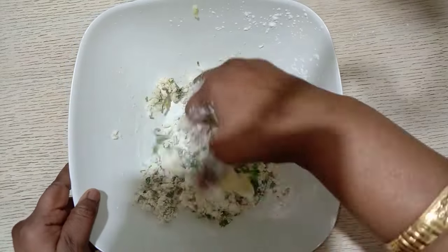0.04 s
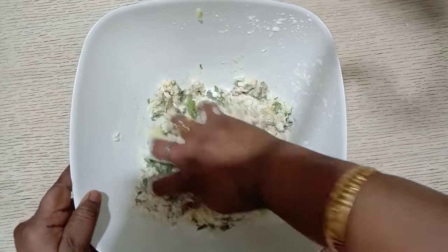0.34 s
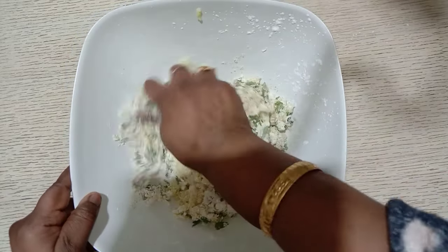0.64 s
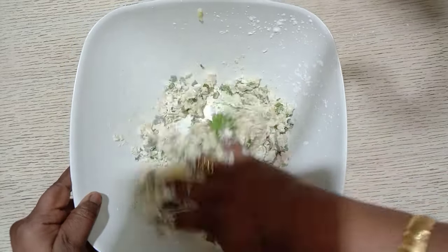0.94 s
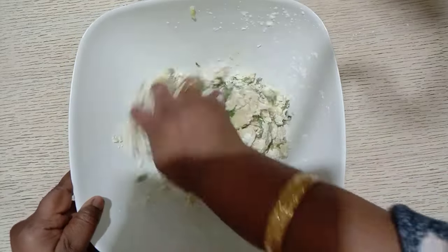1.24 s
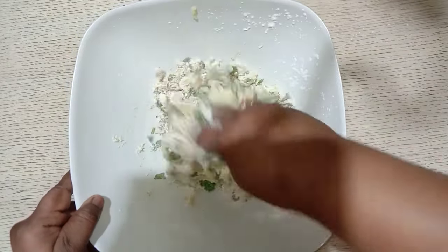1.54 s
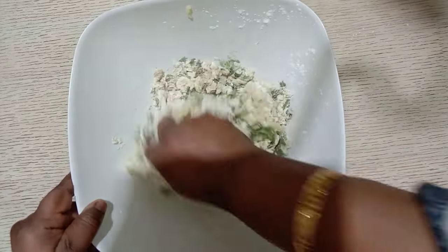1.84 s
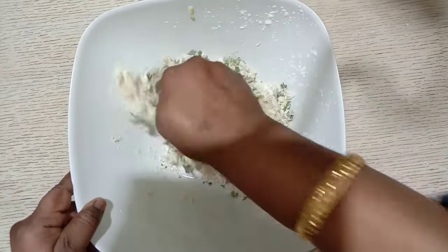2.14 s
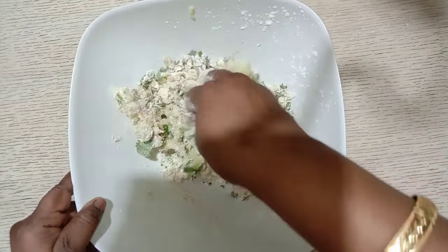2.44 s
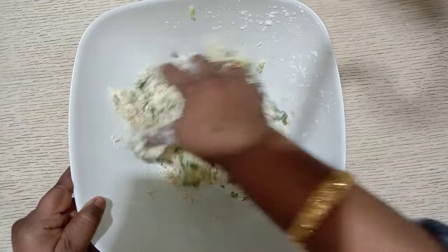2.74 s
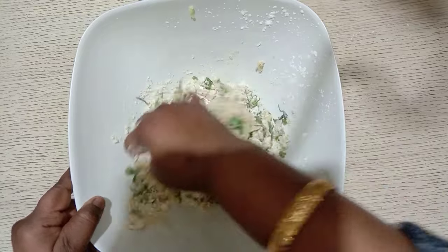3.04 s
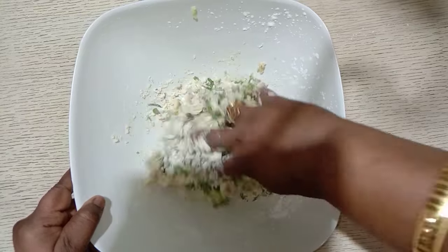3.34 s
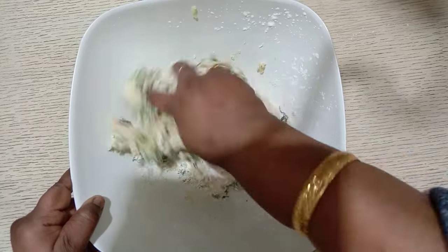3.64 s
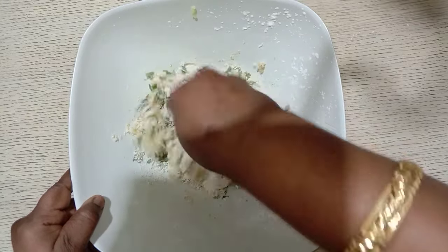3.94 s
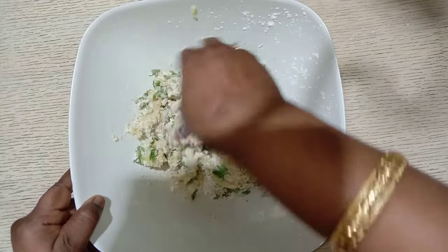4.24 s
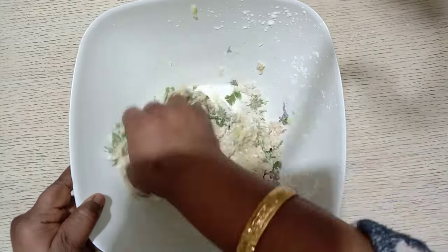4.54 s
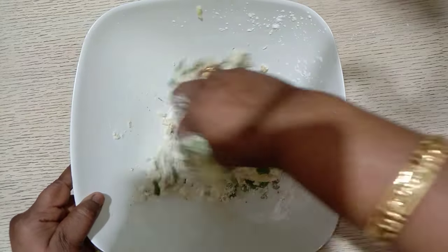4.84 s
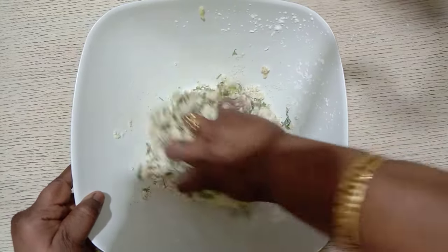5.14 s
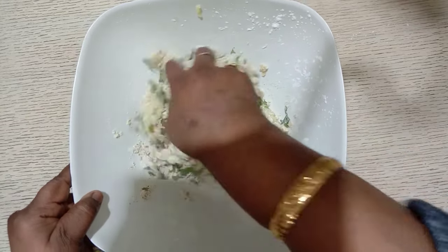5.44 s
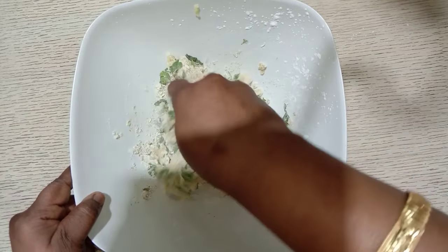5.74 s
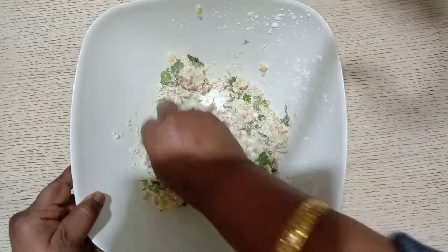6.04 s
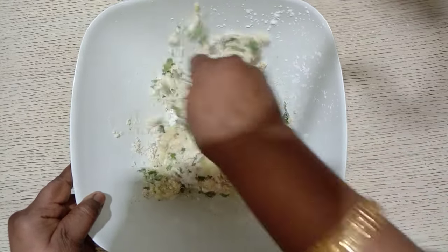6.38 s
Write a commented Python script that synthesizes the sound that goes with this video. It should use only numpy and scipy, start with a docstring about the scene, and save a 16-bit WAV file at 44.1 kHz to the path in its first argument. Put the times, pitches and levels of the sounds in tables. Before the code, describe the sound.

Quiet, irregular swishes and squelches of hand mixing, broken by three much louder clonks of a ceramic bowl against a wooden table.

```python
"""A hand kneads floury mashed potato in a ceramic bowl on a wooden table, heard from close by.
Sliding friction makes a soft hiss as each sweep drags crumbs over the glaze. Between sweeps the mash
squelches and moist bits snap; fingers rub and tap, exciting the modes of the bowl.
The palm thuds into the mass; the bowl rocks with low bumps and three times tips and knocks on the table.
A small kitchen adds its reverberation and a faint hum."""
import sys
import numpy as np
from scipy import signal
from scipy.fft import rfft, irfft
from scipy.io import wavfile

SR = 44100
rng = np.random.default_rng(int(sys.argv[2]) if len(sys.argv) > 2 else 0)


def persist_wave(psi):
    """Save psi, clipped to +-1, as 16-bit WAV."""
    counts = np.round(np.clip(psi, -1, 1) * 32767).astype(np.int16)
    wavfile.write(sys.argv[1], SR, np.atleast_2d(counts).T)


N = 287091
T = np.arange(N) / SR
TOP_HZ, FILTER_SIZE = 15550, 16384
FREQS = np.fft.rfftfreq(FILTER_SIZE, 1 / SR)

# Modes of the bowl on the table, damped by the holding hand.
# Each row: frequency in Hz, level in dB, 60 dB decay time in seconds.
BOWL = [(203, -23.5, 0.072), (392, -14.5, 0.044), (522, -16, .03), (664, 4, 0.012), (855, -2.5, 0.008),
        (1236, -18, 0.038), (2130, -23, .012), (4360, -28, .015)]


def undb(db):
    """Amplitude ratio of a level in decibels."""
    return 10 ** (np.asarray(db) / 20)


def unit(x):
    """Normalisation to an rms of 1."""
    return x / np.sqrt(np.mean(x ** 2))


def colour(x, points, peaks=()):
    """Minimum-phase filter through (Hz, dB) points, with resonance peaks (Hz, width in Hz, dB)."""
    hz, db = np.transpose(points)
    db = np.interp(np.log(FREQS + 1), np.log(hz), db)
    for centre, width, height in peaks:
        db = db + height / (1 + (2 * (FREQS - centre) / width) ** 2)
    cepstrum = irfft(np.log(undb(db)))
    cepstrum[1:FILTER_SIZE // 2] *= 2  # folding the cepstrum makes the filter causal
    cepstrum[FILTER_SIZE // 2:] = 0
    response = irfft(np.exp(rfft(cepstrum)))[:SR // 10]
    return signal.oaconvolve(x, response)[:len(x)]


def band(x, hz, kind, order=2):
    """Butterworth filter."""
    return signal.sosfilt(signal.butter(order, np.minimum(hz, TOP_HZ), kind, fs=SR, output="sos"), x)


def walk(rate):
    """Random modulation: Gaussian values, rate per second, joined by straight lines."""
    steps = rng.standard_normal(N // 20)
    return np.interp(T * rate, np.arange(len(steps)), steps)


def add(track, s, sound):
    """Superposition of a sound on a track, starting at s seconds."""
    start = max(int(s * SR), 0)
    track[start:start + len(sound)] += sound[:N - start]


def fade(t, t60):
    """Exponential decay by 60 dB in t60 seconds."""
    return np.exp(-np.log(1000) * t / t60)


def ring(modes):
    """Impulse response of a set of modes: a sum of damped sinusoids."""
    t = T[:SR // 2]
    return sum(undb(db) * np.sin(2 * np.pi * hz * t) * fade(t, t60) for hz, db, t60 in modes)


def grains(rate, spread_db):
    """Shot noise: tiny slips of very unequal size, on average rate per second."""
    sizes = undb(spread_db * np.minimum(rng.exponential(size=N), 5))
    return unit((rng.random(N) < rate / SR) * sizes * rng.standard_normal(N))


def gesture(start, length, attack, release, arch_db, fastest=.5):
    """Friction noise grows with speed: a movement's envelope is arch_db lower at its slow ends."""
    t = T - start
    contact = np.interp(t, [0, attack], [0, 1]) * np.interp(t - length, [0, release], [1, 0])
    slowness = np.interp(t, [0, length * np.clip(fastest, .1, .9), length], [1, 0, 1])
    return contact * undb(-arch_db * slowness ** 2)


def room(x, wet_db, t60_low, t60_high):
    """Reverberation: reflections from near walls merge into a short diffuse tail."""
    t = T[:SR]
    noise = rng.standard_normal(SR)
    tail = band(noise, 1800, "low") * fade(t, t60_low) - band(noise, 1500, "high") * fade(t, t60_high)
    tail *= np.clip((t - .003) / 0.0027, 0, 1)  # the first reflection takes 3 ms
    return undb(wet_db) * signal.fftconvolve(x, tail / np.linalg.norm(tail))[:N]


def kitchen():
    """Ambient noise: quiet air and an appliance's hum, wavering in amplitude and phase."""
    # Spectrum of the air. Each row: frequency in Hz, relative level in dB.
    air_spectrum = [(15, -43), (25, -35), (93, -2), (156, -13.5), (221, -4), (274, -13), (598, -17),
                    (782, -17.5), (919, -20), (1270, -19.5), (2230, -27), (4750, -34.5), (5730, -27),
                    (9050, -37.5), (15500, -32.5)]
    # Tones of the hum. Each row: frequency in Hz, rms level in dB.
    hum_tones = [(76, -77), (98, -76), (208, -81.5)]
    air = unit(colour(rng.standard_normal(N), air_spectrum)) * undb(-70 + 2 * walk(rate=2.4))
    hum = np.zeros(N)
    for hz, db in hum_tones:
        amplitude = np.sqrt(2) * undb(db + 3 * walk(rate=8.5))
        hum += amplitude * np.sin(2 * np.pi * hz * T + 0.42 * walk(rate=16))
    return air + hum


def taps():
    """The brief, hard contact of a fingertip or nail excites the high modes of the bowl."""
    # Taps on the glaze. Each row: start in seconds, peak level in dB.
    contacts = [(0.148, -42), (0.8676, -46.5), (1.3257, -49), (1.654, -57), (3.741, -55), (5.6568, -52),
                (5.743, -47)]
    # High modes. Each row: frequency in Hz, level in dB, 60 dB decay time in seconds.
    glaze_modes = [(1230, -8, .06), (2160, -2.5, 0.049), (2450, 1.5, 0.029), (2900, -12, 0.039),
                   (4704, -3.5, 0.072), (4730, -8, 0.0079)]
    out, tick = np.zeros(N), ring(glaze_modes)
    for s, db in contacts:
        add(out, s, undb(db) * tick / np.abs(tick).max())
    return out


def snaps():
    """Rupture: moist crumbs and bits of herb part with a tiny burst of noise."""
    # Bits parting. Each row: start in seconds, level before filtering in dB.
    ruptures = [(0.1471, -51), (0.768, -50), (0.779, -42.5), (0.8189, -48), (1.4421, -55), (1.5232, -55),
                (1.535, -53), (1.833, -47), (2.013, -56), (2.291, -49.5), (2.575, -48), (3.7749, -40.5)]
    # Spectrum of a snap. Each row: frequency in Hz, gain in dB.
    snap_spectrum = [(1000, -24), (3500, -15.5), (6000, 2), (7500, 7.5), (9000, -12), (12500, -20),
                     (15300, -8)]
    out, t = np.zeros(N), T[:SR // 20]
    for s, db in ruptures:
        add(out, s, undb(db) * rng.standard_normal(len(t)) * fade(t, 0.023))
    return colour(out, snap_spectrum)


def squish(squeeze):
    """Moist pockets open in narrow-band bursts, each at its own pitch; pressure sets the amplitude."""
    out, t = np.zeros(N), T[:SR // 12]
    envelope = fade(t, .08) * (1 - np.exp(-t / .01))
    for when, pitch, smallness in rng.random((700, 3)):
        hz = 2400 * 2.8 ** pitch
        pop = band(rng.standard_normal(len(t)), [.92 * hz, 1.08 * hz], "band") * envelope
        add(out, when * N / SR, undb(-10 * smallness) * unit(pop))
    return unit(out) * undb(-6.5) * squeeze


def fingers(sweep, squeeze):
    """Stick-slip friction of skin on the glaze drives one mode of the bowl into a hoarse tone."""
    # Drags on bare glaze. Each row: start and length in seconds, level in dB, mode frequency in Hz.
    rubs = [(0.07, 0.019, -69, 1240), (0.188, 0.069, -59.5, 656), (0.196, 0.047, -67, 1260),
            (0.47, 0.11, -68, 1300), (0.612, .05, -80, 1250), (0.774, 0.058, -66.5, 1260),
            (0.89, 0.18, -67.5, 1224), (1.392, 0.068, -69.5, 1226), (1.51, 0.033, -74.5, 1250),
            (1.632, 0.058, -60.5, 1300), (2.074, 0.22, -89, 1267), (2.572, 0.2, -60.5, 648),
            (2.688, .1, -64, 1300), (2.925, 0.039, -76, 1227), (3.419, 0.15, -74, 1260),
            (3.585, 0.054, -62, 1296), (3.721, 0.064, -67, 1280), (3.85, 0.034, -70, 1257),
            (4.386, 0.07, -61.5, 1266), (4.536, 0.11, -67.5, 1256), (4.758, 0.053, -73.5, 673),
            (4.807, 0.05, -71, 1270), (5.217, 0.036, -58, 1214), (5.202, 0.064, -59.5, 621),
            (5.35, 0.12, -70.5, 1290), (5.52, 0.029, -64.5, 1270), (5.817, 0.04, -64, 1250),
            (5.862, 0.13, -69, 1245), (5.998, 0.024, -65, 680), (6.087, 0.041, -53.5, 770),
            (6.101, 0.047, -66.5, 1256), (6.21, 0.061, -76.5, 1227), (6.385, 0.06, -74.5, 1280)]
    # Spectrum of a rub around the mode at mode_hz. Each row: frequency in Hz, relative level in dB.
    rub_spectrum = [(600, -54), (1080, -20), (1250, 5.5), (1370, -5), (1520, -13.5), (2600, -50.5)]
    # Fingertips catching. Each row: start in seconds, level in dB, pitch in Hz.
    chirps = [(0.9223, -43, 1290), (3.3144, -52.5, 1450), (4.249, -52, 1493), (5.681, -48.5, 1320)]
    mode_hz = 1256
    slips = grains(rate=900, spread_db=2.5)
    pressure = np.hypot(undb(-18) * sweep, undb(-13.5) * squeeze)  # every movement rubs lightly
    out = unit(colour(slips, rub_spectrum)) * pressure * undb(3.2 * walk(rate=18))
    for s, length, db, hz in rubs:
        shifted = [(max(f + hz - mode_hz, 20), gain_db) for f, gain_db in rub_spectrum]
        envelope = gesture(s, length, attack=.016, release=.025, arch_db=5)
        out += unit(colour(slips, shifted)) * undb(db) * envelope
    t = T[:SR // 8]
    chirp_envelope = fade(t, 0.095) * (1 - np.exp(-t / 0.0012))
    for s, db, hz in chirps:
        waver = 1 + 0.045 * walk(rate=100)[:len(t)]
        chirp = np.sin(2 * np.pi * hz * np.cumsum(waver) / SR)
        add(out, s, undb(db) * chirp * chirp_envelope)
    return out


def thuds():
    """Soft impact: a force spread in time excites mainly the low modes, so the bowl sounds dull."""
    # Dull thuds: the hand landing in the mass, and low bumps of the bowl rocking on the table.
    # Each row: start in seconds, peak level in dB, brightness in Hz.
    soft_impacts = [(0.005, -54, 270), (0.149, -42, 740), (0.798, -54, 624), (0.872, -45.5, 685),
                    (1.652, -47, 763), (2.591, -50, 657), (3.069, -61, 112), (3.218, -53.5, 380),
                    (3.255, -52.5, 120.4), (3.654, -49.5, 343), (3.685, -50.5, 262), (3.739, -49.5, 640),
                    (3.794, -55.5, 184), (3.929, -56.5, 498), (4.251, -41.5, 510), (4.712, -61.5, 274),
                    (5.932, -42.5, 490), (5.946, -49.5, 227), (6.124, -47.5, 740)]
    out, t, body = np.zeros(N), T[:SR // 10], ring(BOWL)
    for s, db, hz in soft_impacts:
        push = 0.084 * rng.standard_normal(len(t)) * fade(t, .12)
        push[0] += 1  # first contact
        blow = signal.fftconvolve(push, body)
        blow = band(blow, 0.32 * hz, "high", order=3)
        blow = band(blow, 1.355 * hz, "low", order=5)
        add(out, s, undb(db) * blow / np.abs(blow).max())
    return out


def knocks():
    """Hard impact of bowl on table: a crack, a short clonk, then faint resonance of room and bowl."""
    # Each row: start in seconds, peak level of the blow in dB, frequency favoured by the contact point
    # in Hz, table boom in dB, crack relative to the blow in dB, cutoff of the crack in Hz.
    impacts = [(1.0439, -5, 774, 0, -17.5, 5100), (1.7235, -11.5, 648, 4.5, -17.5, 2726),
               (5.5875, -18.5, 390, 9.5, -17.5, 2124)]
    # Lasting modes of the room and the bowl, ringing faintly after each knock.
    # Each row: frequency in Hz, relative level in dB, 60 dB decay time in seconds.
    lasting_modes = [(178, -16, .4), (208, -10, .5), (249, -13, .45), (380, -11, .36), (450, -10, .35),
                     (502, -7, .33), (554, -3, .38), (592, -4, .33), (646, -5, .4), (677, 0, .33),
                     (737, -1, .33), (764, -5, .33), (831, -3, .3), (910, -9, .36), (1036, -14, .38),
                     (1257, -12, .4), (1414, -22, .4)]
    out, t = np.zeros(N), T[:SR // 2]
    clonk = ring(BOWL) * (1 - np.exp(-t / 0.0011))
    after_ring = ring(lasting_modes) * (1 - np.exp(-t / .004))
    body = clonk + undb(-32) * after_ring
    for s, db, hz, boom_db, crack_db, top_hz in impacts:
        blow = colour(body, [(45, -16.5), (90, -1.5), (150, -5), (210, boom_db), (550, 1)],
                      peaks=[(hz, 300, 6)])
        crack = rng.standard_normal(len(t)) * (fade(t, .007) + undb(-21) * fade(t, .25))
        crack = colour(crack, [(700, -20.5), (1700, -6.5), (2400, 4), (3600, -10), (4500, 0)])
        crack = band(crack, top_hz, "low", order=6)
        knock = blow / np.abs(blow).max() + undb(crack_db) * crack / np.abs(crack).max()
        add(out, s, undb(db) * knock)
    return out


def hand():
    """Envelopes of the sweeping, the mass pushed along and the squeezing; sweeps add in power."""
    # Sweeps through the mixture. Each row: start and length in seconds, fastest moment as a share
    # of the length, level in dB, mass pushed along in dB relative to the sweep.
    strokes = [(0.127, 0.16, 0.64, -58.5, 10.5), (0.294, 0.28, 0.66, -49.5, 0.5),
               (0.856, 0.38, 0.67, -51.5, 7), (1.617, .35, 0.73, -55, 3), (2.557, 0.41, 0.74, -47.5, -2.5),
               (3.303, 0.38, 0.5, -52.5, 4), (4.258, .24, 0.71, -49.5, 3), (4.477, .13, 0.52, -53.5, 2.5),
               (4.979, .38, 0.37, -48, -1.5), (5.908, .39, 0.41, -60, 6), (6.431, 0.26, 0.3, -61.5, 3)]
    # Slow squeezes of the mash. Each row: start and length in seconds, level in dB.
    squeezes = [(0.577, 0.078, -65.5), (0.692, 0.16, -69), (1.244, 0.15, -66.5), (1.493, 0.24, -68),
                (1.96, 0.05, -63), (2.048, 0.15, -73), (2.262, 0.097, -72.5), (3.013, 0.51, -71),
                (3.7, 0.25, -66.5), (4.002, 0.059, -71), (4.227, 0.065, -65.5), (4.612, 0.088, -80),
                (4.768, 0.042, -66.5), (4.84, 0.15, -69), (5.37, 0.067, -74), (5.434, 0.17, -65.5),
                (5.58, .13, -67), (5.71, 0.36, -67)]
    sweep, mass, squeeze = np.zeros((3, N))
    for s, length, fastest, db, mass_db in strokes:
        stroke = undb(db) * gesture(s, length, attack=.022, release=.042, arch_db=10.5, fastest=fastest)
        sweep = np.hypot(sweep, stroke)
        mass = np.hypot(mass, stroke * undb(mass_db))
    for s, length, db in squeezes:
        squeeze += undb(db) * gesture(s, length, attack=.013, release=.03, arch_db=2.5)
    return sweep, mass, np.hypot(squeeze, undb(-77.5))  # the hand never lies quite still


def crumbs(sweep, mass, squeeze):
    """Sliding friction: countless slips of crumbs on the glaze merge into a hiss; mass deepens it."""
    # Spectrum of the hiss. Each row: frequency in Hz, relative level in dB.
    hiss_spectrum = [(300, -17), (480, -14), (680, -2), (950, -9), (1700, -9.5), (2350, -7), (3200, -6.5),
                     (4600, -2.5), (5600, -4), (7500, -8.5), (8600, -15), (12000, -25), (14000, -31),
                     (15300, -8)]
    # Resonances and dips in the hiss. Each row: centre and width in Hz, gain in dB.
    resonances = [(2000, 180, -1), (2343, 150, 5), (4473, 150, 3), (6037, 300, 9), (6630, 240, -13.5),
                  (7070, 1200, 12)]
    hiss = colour(grains(rate=7500, spread_db=2.1), hiss_spectrum, resonances)
    # bands come and go as the hand covers the bowl
    hiss += sum(band(hiss, [hz / 1.15, hz * 1.15], "band") * (undb(1.64 * walk(rate=24)) - 1)
                for hz in (2270, 3353, 4570, 6012))
    deep = band(hiss, 2200, "low") * undb(1.5 * walk(rate=16))
    fine = band(hiss, 2600, "high")
    # a squeezing hand hardly slides, so it hisses less
    sound = fine * np.hypot(sweep, undb(-2.5) * squeeze) - deep * np.hypot(mass, undb(-2) * squeeze)
    surges = undb(-2 + 0.77 * walk(rate=55))
    return sound / np.std(fine) * surges


def scene():
    """Mid-side stereo: every source is central, with a trace of reverberation at the sides."""
    # The kitchen corner swells the bass of a blow's echo. Each row: frequency in Hz, gain in dB.
    corner_gain = [(50, 2), (90, 7.5), (135, 7), (220, 3.5), (350, -2), (620, -3), (1050, -2.5),
                   (1300, 1.5), (1620, -5.5), (2300, -2), (6000, -10)]
    # Spectral weighting of the side signal. Each row: frequency in Hz, gain in dB.
    side_gain = [(30, -13.5), (80, -32.5), (250, -21), (700, -21.5), (1500, -20.5), (4000, -19.5),
                 (8000, -39.5), (13000, -18)]
    blows = band(knocks() + thuds(), 60, "high")
    sweep, mass, squeeze = hand()
    kneading = crumbs(sweep, mass, squeeze) + fingers(sweep, squeeze) + snaps() + taps()
    kneading += squish(squeeze)
    echo = room(colour(blows, corner_gain), wet_db=-8.5, t60_low=0.42, t60_high=0.12)
    soft_sounds = kneading + room(kneading, wet_db=-9, t60_low=.22, t60_high=.2) + kitchen()
    mid = blows + echo + soft_sounds
    lateral = room(soft_sounds + undb(-33.5) * echo, wet_db=2, t60_low=.1, t60_high=0.054)
    side = colour(lateral, side_gain)
    return np.array([mid + side, mid - side])


def record(dry):
    """Band limiting: a steep elliptic low-pass removes the highest treble."""
    return signal.sosfilt(signal.ellip(10, .2, 70, TOP_HZ, fs=SR, output="sos"), dry)


dry = scene()
out = record(dry)
persist_wave(out)
```